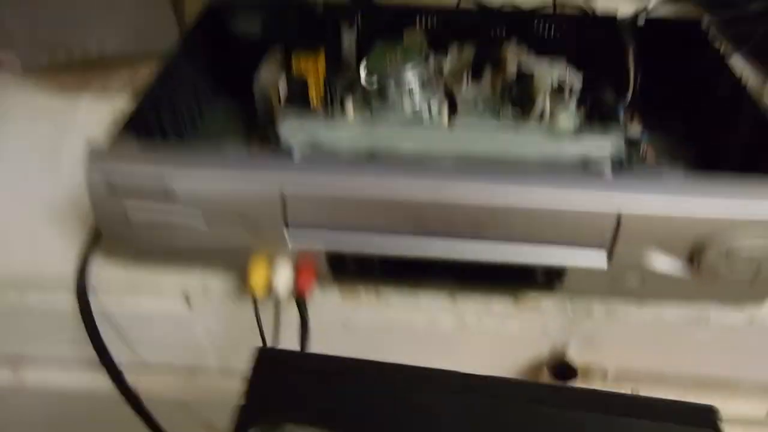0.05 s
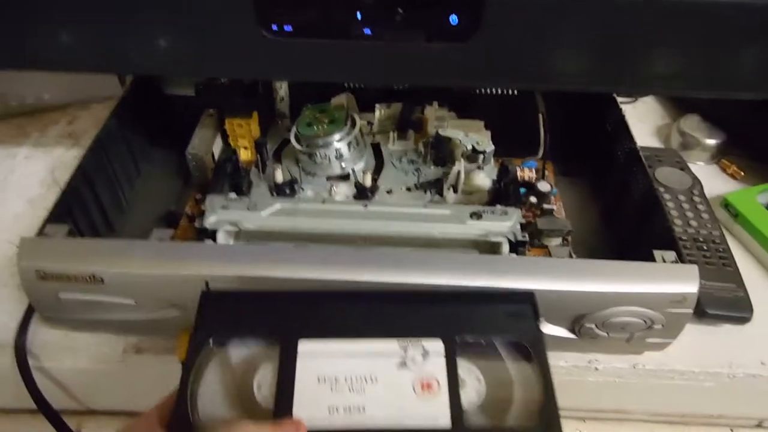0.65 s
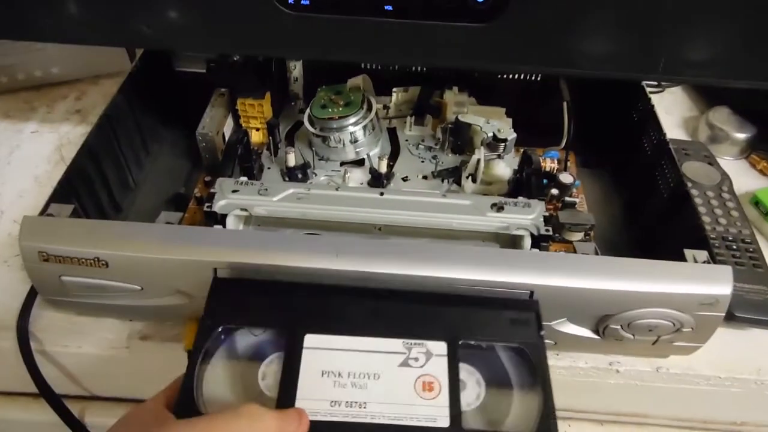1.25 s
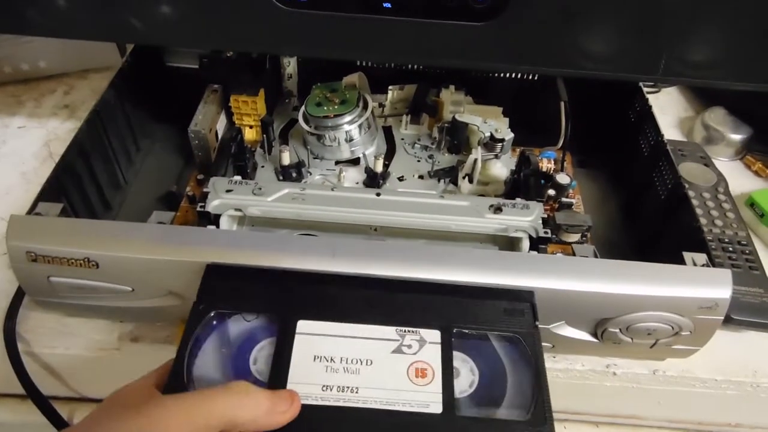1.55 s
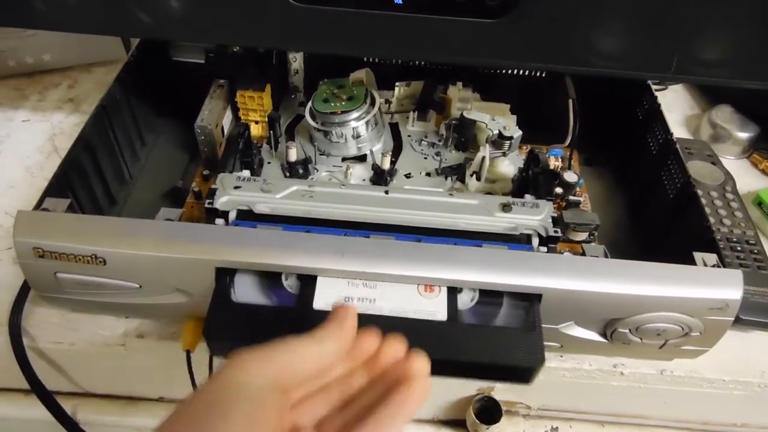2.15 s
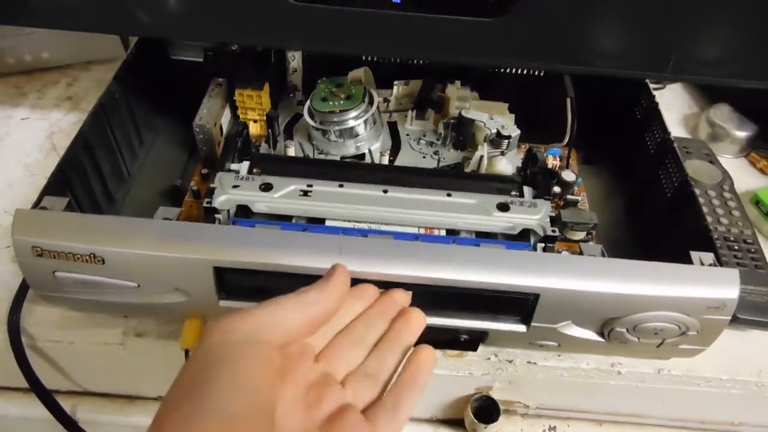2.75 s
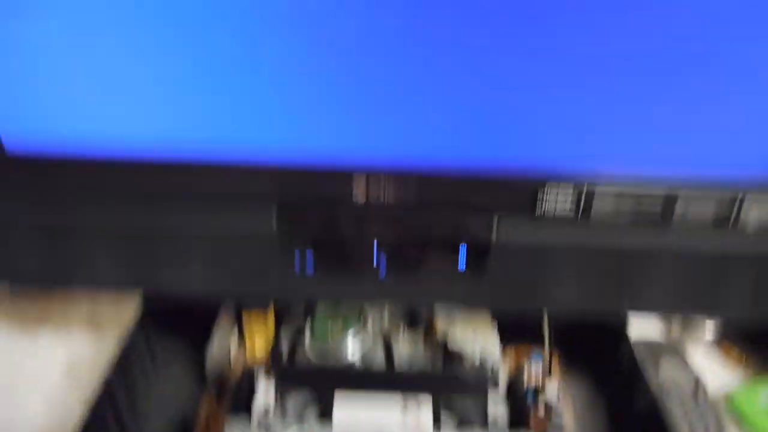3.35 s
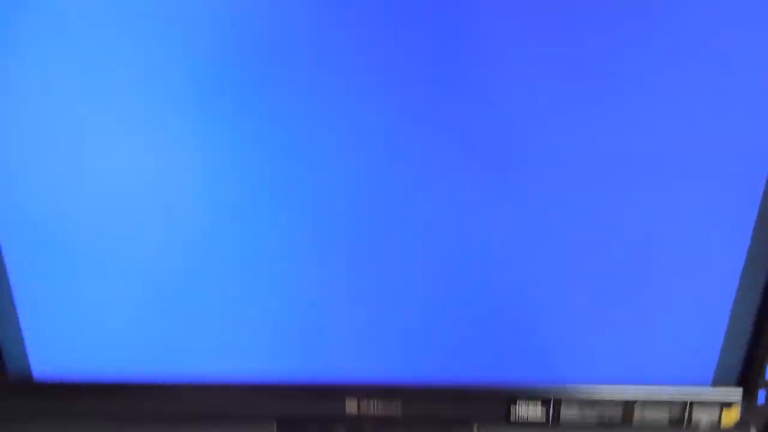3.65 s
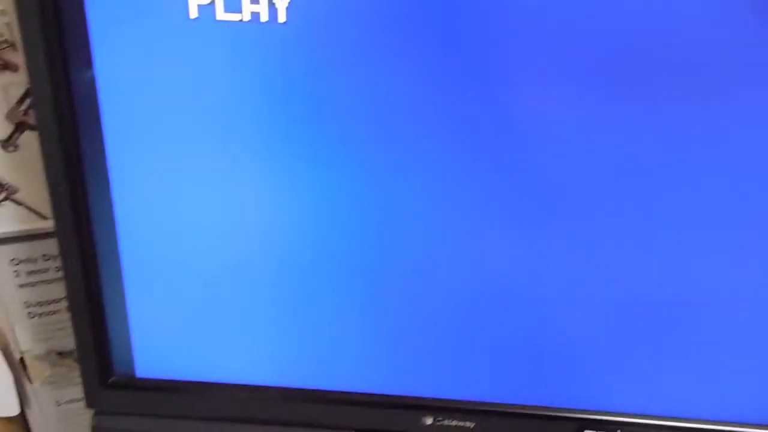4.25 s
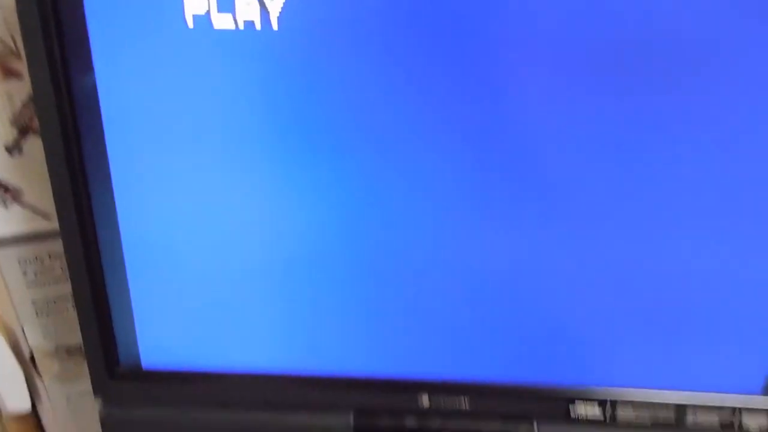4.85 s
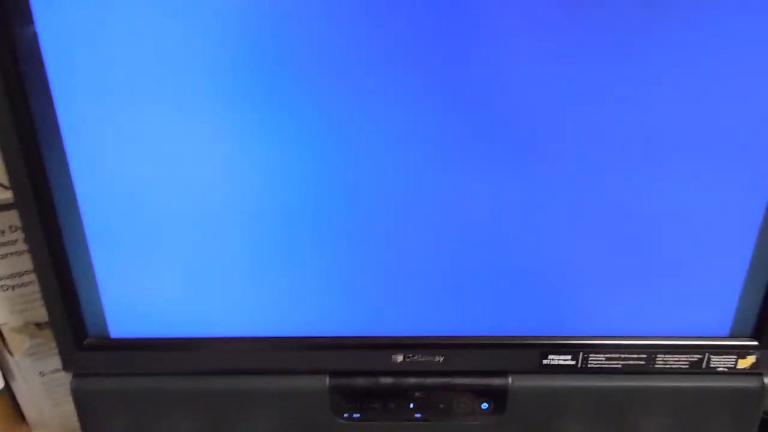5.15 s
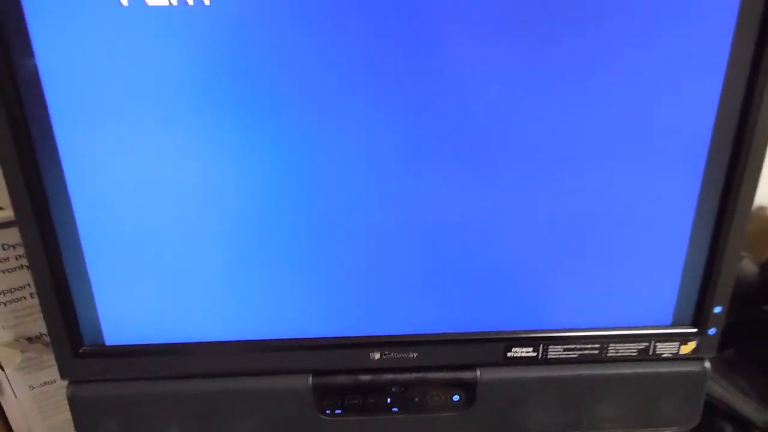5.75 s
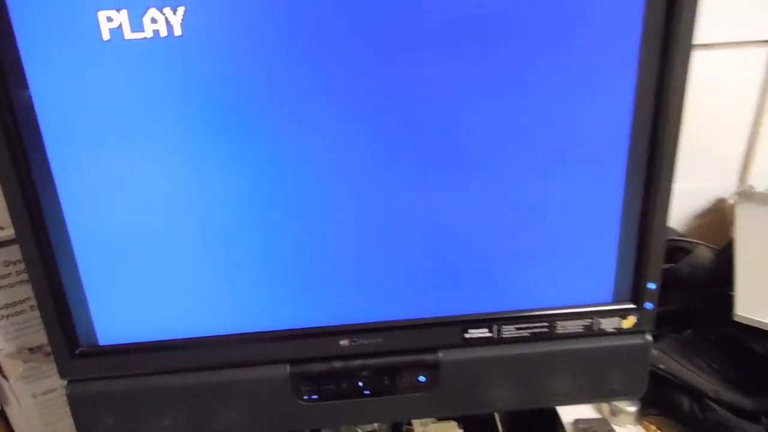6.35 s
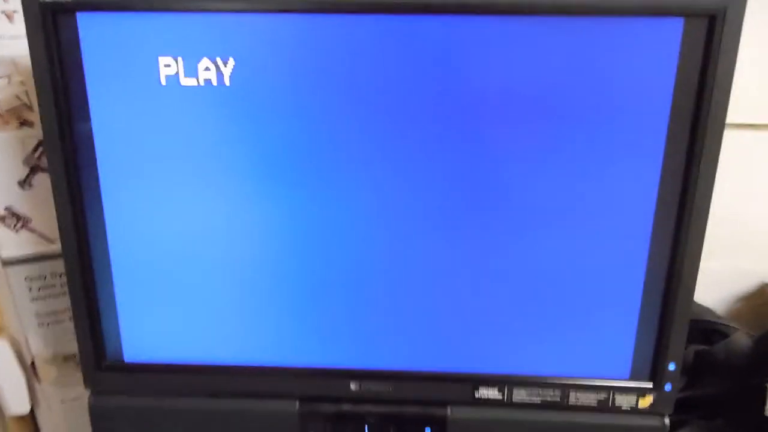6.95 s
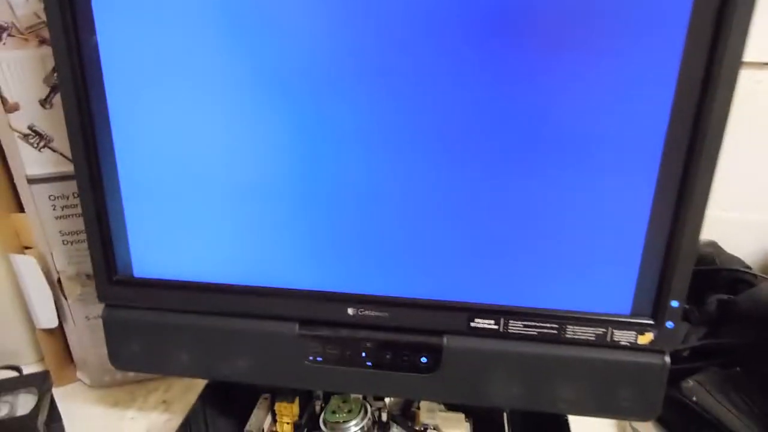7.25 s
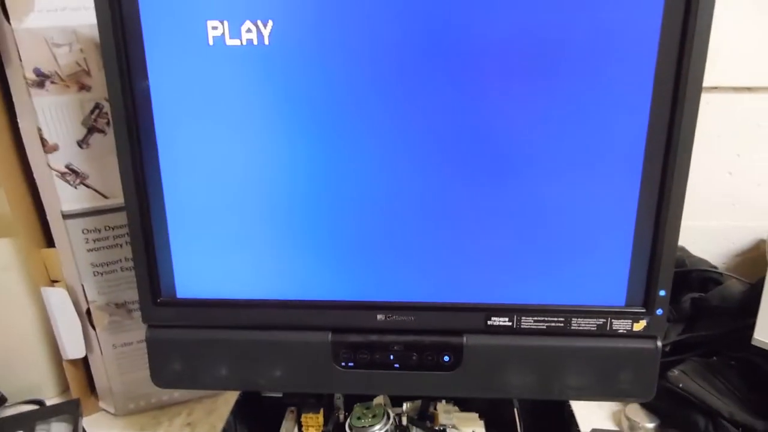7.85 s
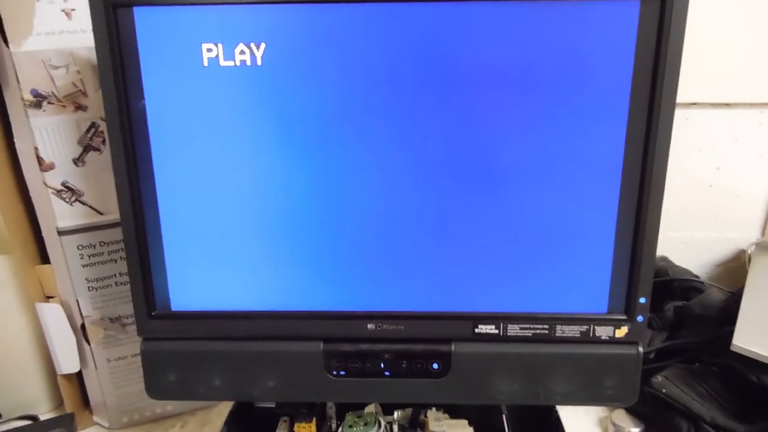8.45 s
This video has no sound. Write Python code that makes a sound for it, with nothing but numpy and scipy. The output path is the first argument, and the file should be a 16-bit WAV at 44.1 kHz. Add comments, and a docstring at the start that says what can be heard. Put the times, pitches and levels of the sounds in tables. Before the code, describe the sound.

A plastic videocassette clacks and scrapes into a video recorder, then gears whir, a motor whines up and small levers click indoors.

```python
"""A small room, close to an open video recorder. A plastic cassette is picked up, knocked against the
slot and pushed in: it clacks and scrapes, ringing shell, tray and chassis. Gears whir as it is drawn
in and dropped on the deck. The head drum whines up to speed, levers click and the capstan starts the
tape. Brief squeaks, one pop and a few soft handling bumps and rustles sound over a faint hiss."""
import sys
import numpy as np
from scipy import signal
from scipy.fft import rfft, irfft
from scipy.io import wavfile

SR = 44100
rng = np.random.default_rng(int(sys.argv[2]) if len(sys.argv) > 2 else 0)


def persist_wave(psi):
    """Save psi, clipped to +-1, as 16-bit WAV."""
    counts = np.round(np.clip(psi, -1, 1) * 32767).astype(np.int16)
    wavfile.write(sys.argv[1], SR, np.atleast_2d(counts).T)


N = 374850
TIME = np.arange(N) / SR
DRUM_START_S = 4.19
# spectrum of the struck or rubbed shell: f/Hz, density/dB
CLACK_SPECTRUM = [(40, -33), (100, -21), (150, -22), (260, -16.5), (350, -8), (520, -9), (660, 0),
                  (1400, -1), (2800, -1), (5600, -8.5), (7900, -5.5), (9500, -14.5), (12000, -29.5),
                  (16000, -47)]


def cassette_knocks():
    """The shell strikes flap, guides and deck."""
    # blows: t/s, level/dB, bass shelf/dB, treble shelf/dB
    knocks = [(.559,-25,8.5,18), (.8598,-14.5,-11,0), (.865,-15,-1.5,3), (.925,-31.5,-1,-5),
              (1.2647,-14.5,-9.5,7), (1.3658,-25,2,-4.5), (1.4295,-26,-4,0), (1.452,-18.5,2,0.5),
              (1.459,-21,6,2.5), (1.567,-34,11,15), (1.577,-28,0,0), (1.765,-23,-23,-3), (1.78,-6,-9.5,0),
              (1.793,-25,18,21), (1.957,-17.5,-19,-2), (2.005,-10,4,-15), (2.017,-14,2,-10),
              (2.084,-22,1.5,-6.5), (2.2705,-39,6,-1), (2.312,-23.5,7,-9.5), (2.497,-38,10.5,3.5),
              (2.668,-38.5,18,9), (2.737,-18,1,1.5), (2.7555,-17,10,14), (2.962,-29.5,-12.5,-4.5),
              (2.999,-34.5,-4,-31), (3.074,-37,-5,-2), (3.169,-35,9,13.5), (3.3285,-20.5,-34,-7),
              (3.351,-19.5,-8,10.5), (3.396,-28,12.5,7), (3.478,-32.5,-20,-9), (3.499,-25,-23,1),
              (3.512,-23.5,14.5,14), (3.523,-15,11,8), (3.6,-36,6,3), (3.666,-37.5,7,-10)]
    return impacts(knocks, CLACK_SPECTRUM, ring_db=-10)


def impacts(rows, spectrum, ring_db, gain_db=0, size=8192):
    """Each blow is a crack, dying chatter and four short rings; firm blows damp sooner than loose ones."""
    firm_t60_s, loose_t60_s, firm_above_db, knee_db = 0.028, 0.09, -21, 3
    crack, build_s, ring_width_hz = 3.3, 0.00019, 160
    out, age = np.zeros(N), np.arange(size) / SR
    for start_s, db, bass_db, treble_db in rows:
        t60_s = firm_t60_s + (loose_t60_s - firm_t60_s) / (1 + np.exp((db - firm_above_db) / knee_db))
        blow = grains(per_s=9000, spread_db=3.45, size=size)
        blow *= (1 - np.exp(-age / build_s)) * decay(age, t60_s)
        blow[0] += crack * rng.choice([-1, 1])
        rings_hz = 1500 * 5 ** rng.random(4)
        rings = from_db(ring_db) * sum(resonance(blow, hz, ring_width_hz) for hz in rings_hz)
        plain = colour(blow, spectrum, bass_db, treble_db)
        ringing = colour(blow + rings, spectrum, bass_db, treble_db)
        ringing *= np.linalg.norm(plain) / np.linalg.norm(ringing)  # rings add no energy
        add(out, start_s, from_db(db + gain_db) * ringing)
    return highpass(out, 80, order=2)  # small parts radiate no deep bass


def cassette_scrapes(catch_db=-1, catches_per_s=90):
    """Stick-slip grains shake the shell as it slides along hand, flap and guides."""
    # strokes: peak t/s, level/dB, rise/s, fall/s, treble shelf/dB
    strokes = [(0.158,-50,0.14,0.076,-12), (0.329,-36.5,0.21,0.23,9.5), (.45,-45,0.045,0.22,5),
               (0.573,-29,0.018,0.083,14), (1.01,-43.5,0.12,0.084,-2), (1.248,-35.5,0.11,0.054,-6.5),
               (1.461,-27.5,0.027,0.073,-11), (1.788,-19,0.044,0.048,-1.5), (2.009,-19.5,.1,0.053,4.5),
               (2.308,-34.5,0.039,0.024,1.5), (2.65,-38.5,0.095,0.18,1), (2.764,-32,0.04,0.046,-17),
               (3.17,-45.5,.1,0.087,-18), (3.355,-28.5,0.033,0.09,3), (3.519,-20.5,0.026,0.037,6.5),
               (3.65,-47,0.13,.07,-5)]
    slips = grains(per_s=5000, spread_db=5.2) * from_db(catch_db * drift(catches_per_s))
    rub = colour(slips, CLACK_SPECTRUM)
    treble = signal.sosfiltfilt(signal.butter(2, 5000, "high", fs=SR, output="sos"), rub)
    out = 0
    for peak_s, db, rise_s, fall_s, treble_db in strokes:
        shelved = rub + (from_db(treble_db) - 1) * treble
        shelved_rms = np.sqrt(1 + 0.11 * (from_db(2 * treble_db) - 1))
        out += swell(peak_s, db, rise_s, fall_s) * shelved / shelved_rms
    return out


def tray(x, seated_s=2.27, seating_s=0.09, ring_db=-2):
    """Once the cassette is seated, blows and rubbing ring the hollow tray."""
    return x + from_db(ring_db) * resonance(x * ramp(seated_s, seating_s), hz=712, width_hz=97)


def chassis(x, ring_db=-7.5, spread_db=2.5, points_per_s=9):
    """Shell and sheet-metal deck ring on; each mode's share varies with the point of contact."""
    # modes: f/Hz, relative level/dB, t60/s
    modes = [(105.3, 9.5, 0.32), (356, -4, 0.43), (642, 0.5, 0.065), (717, 3, 0.081), (724, -2, 0.061),
             (930, -10.5, 0.23), (960, 7, 0.035), (1016, -1.5, 0.079), (1298, 3, 0.21), (1450, -12, 0.61),
             (2220, -42, 0.15), (2520, -24, 0.14), (3270, -8, 0.037), (8390, 6.5, 0.087)]
    rings = 0
    for hz, db, t60_s in modes:
        share = from_db(db + ring_db + spread_db * drift(points_per_s))
        rings += resonance(x * share, hz, width_hz=np.log(1000) / np.pi / t60_s)
    return x + rings


def head_drum(top_hz=1417, climb_hz_per_s=2050, ease_s=0.12, drive_db=-40.5):
    """Drive harmonics sweep up through the drum's resonances; as torque eases, the deck's hum fades in."""
    # drum resonances: f/Hz, width/Hz, gain/dB
    modes = [(1128, 33, 11), (1440, 49, -11), (2410, 940, -14), (3500, 900, -17)]
    # hum of the running deck: f/Hz, level/dB
    hum_lines = [(1050, -68), (1085, -72.5), (1437, -63), (2040, -96), (3650, -74), (6998, -75)]
    climb_s = top_hz / climb_hz_per_s
    speed = ramp(DRUM_START_S, climb_s)
    torque = ramp(DRUM_START_S + climb_s + ease_s, -2 * ease_s)
    drive_hz = top_hz * speed
    phase = wavering_phase(drive_hz, waver=0.022)
    pulses = sum(np.sin(k * phase) * (k * drive_hz < SR / 4) / k for k in range(1, 9))
    drive = pulses * np.sqrt(speed) * torque * from_db(drive_db)
    drive = highpass(drive, 700, order=6)  # a small drum radiates little bass
    whine = sum(from_db(db + 3.5 * drift(per_s=70)) * resonance(drive, hz, width_hz)
                for hz, width_hz, db in modes)
    hum = sum(from_db(db + 1.5 * drift(per_s=6.9)) * tone(hz, waver=0.00843) for hz, db in hum_lines)
    return whine + (1 - torque) * hum


def drum_shudder():
    """Uneven torque rings the drum: a shudder early in the climb, a whistle near the top."""
    shudder = swell(peak_s=4.44, db=-45, rise_s=0.45, fall_s=0.24) * noise_band(hz=1113, width_hz=100)
    whistle = swell(peak_s=4.8, db=-62, rise_s=1.0, fall_s=0.45) * noise_band(hz=7110, width_hz=110)
    return (shudder + whistle) * ramp(DRUM_START_S, 0.0098)


def levers():
    """Small levers and brakes click along the tape path."""
    # clicks: t/s, relative level/dB, bass shelf/dB, treble shelf/dB
    clicks = [(3.998,-33,-7,-12.5), (4.083,-42,5,-7), (5.131,-35.5,10,6.5), (5.644,-30.5,-41,3.5),
              (5.732,-35.5,-48,0), (5.785,-29.5,-1,2), (5.962,-37,5,2), (6.027,-36,4,-2), (6.273,-45.5,6,3),
              (6.361,-42.5,5,-10), (6.378,-35,-37,-17), (6.529,-37,-7,-28), (6.551,-37.5,-3,-7)]
    # lever spectrum: f/Hz, density/dB
    spectrum = [(100, -42), (400, -6.5), (700, -5), (1150, 9.5), (1600, 1.5), (2600, 1.5), (3900, 1),
                (5000, 4), (6200, -0.5), (7900, 6), (9500, -5), (15000, -37)]
    return impacts(clicks, spectrum, ring_db=-3, gain_db=1.5)


def capstan(start_s=8.262, rise_s=0.062, attack_s=0.023, from_hz=1220, top_hz=1800, pull_db=3):
    """A rough whir jumps up to speed, a little louder while it pulls."""
    hz = from_hz + (top_hz - from_hz) * ramp(start_s, rise_s)
    pull = 1 - ramp(start_s + rise_s, attack_s)
    gain = ramp(start_s, attack_s) * from_db(-47.5 + pull_db * pull)
    whir = 0.3 * tone(hz, waver=0.0122) + 0.5 * tone(hz, waver=0.06)
    octave = from_db(-17) * tone(2 * hz, waver=0.03)
    return gain * (whir + octave)


def gears(ramp_s=0.034, flutter_db=2):
    """Plastic teeth and tape guides rub in a fine, uneven whir."""
    # loading, turning the reels, shifting the tape path: start t/s, stop t/s, level/dB
    runs = [(2.557, 4.144, -56), (5.06, 8.7, -58.5), (5.688, 7.97, -58.5)]
    # gear spectrum: f/Hz, density/dB
    spectrum = [(80, -24), (250, -5), (700, -1), (1400, 2), (2600, 0), (5500, -5), (8100, -2),
                (10000, -13.5), (15000, -28)]
    power = sum(from_db(db) ** 2 * ramp(start_s, ramp_s) * ramp(stop_s, -ramp_s)
                for start_s, stop_s, db in runs)
    teeth = grains(per_s=4000, spread_db=3.6) * np.sqrt(power)
    return colour(teeth * from_db(flutter_db * drift(per_s=60)), spectrum)


def pop(tick_hz=4300, tick_t60_s=0.0048, size=4000):
    """A sharp pop: one short ring with a bright tick and no bass."""
    # pop: t/s, level/dB, f/Hz, t60/s
    pops = [(7.001, -19, 1526, 0.021)]
    out, age = np.zeros(N), np.arange(size) / SR
    for start_s, db, hz, t60_s in pops:
        ring = np.sin(2 * np.pi * hz * age) * decay(age, t60_s)
        tick = 0.51 * np.sin(2 * np.pi * tick_hz * age) * decay(age, tick_t60_s)
        add(out, start_s, from_db(db) * (ring + tick))
    return highpass(out, 1000, order=4)


def handling(size=12000):
    """Handling makes dull bumps and soft rustles."""
    # bumps: t/s, level/dB, t60/s
    bumps = [(.425, -36, 0.23), (6.851, -33, 0.14), (7.372, -49.5, 0.21), (7.416, -36, 0.18),
             (7.834, -46.5, 0.14)]
    # rustles: peak t/s, level/dB, rise/s, fall/s
    swishes = [(6.575,-40.5,0.11,0.099), (6.96,-51.5,0.35,0.12), (7.3,-47.5,.27,0.1),
               (7.43,-48.5,0.15,0.18), (7.9,-52,0.094,0.12)]
    # bump and rustle spectra: f/Hz, density/dB
    bump_spectrum = [(60, -26), (120, -26), (170, 4.5), (280, -3.5), (420, 7), (600, 2.5), (1200, 3),
                     (2000, -8.5), (5000, -27), (12000, -57)]
    rustle_spectrum = [(200, -26), (900, 7), (2500, 3), (5000, 0), (8000, 10.5), (11000, -3.5),
                       (16000, -21)]
    thuds, age = np.zeros(N), np.arange(size) / SR
    for start_s, db, t60_s in bumps:
        add(thuds, start_s, from_db(db) * grains(per_s=3000, spread_db=1, size=size) * decay(age, t60_s))
    rustle = sum(swell(*row) for row in swishes) * grains(per_s=9800, spread_db=4.2)
    return colour(thuds, bump_spectrum) + colour(rustle, rustle_spectrum)


def squeaks():
    """Rubbed plastic and bearings give short, rough whistles."""
    # squeaks: t/s, length/s, f/Hz, level/dB
    whistles = [(0.35, 0.17, 1874, -42.5), (0.37, 0.17, 2360, -44), (3.91, 0.18, 5640, -54),
                (6.011, 0.046, 7730, -38), (6.144, 0.14, 6800, -61), (7.705, 0.066, 5630, -55),
                (7.711, 0.041, 3650, -57.5), (8.025, .07, 5710, -59)]
    return sum(from_db(db) * np.sin(np.pi * ramp(start_s, length_s)) ** 2 * tone(hz, waver=0.035)
               for start_s, length_s, hz, db in whistles)


def room_echo(x, build_s=0.0024, size=26000):
    """Dense reflections build quickly and die at their own rate in each octave."""
    # reverberation: f/Hz, t60/s
    decay_times = [(100, 0.26), (260, 0.35), (700, 0.28), (1840, 0.34), (4850, 0.18), (12800, 0.29)]
    age, hz = np.arange(size) / SR, np.arange(size // 2 + 1) * SR / size
    white, centres_hz = rfft(rng.standard_normal(size)), np.geomspace(100, 12800, 8)
    tail = 0
    for centre_hz, share in zip(centres_hz, np.eye(len(centres_hz))):
        band = irfft(white * at_hz(np.c_[centres_hz, share], hz))
        tail += band * decay(age, at_hz(decay_times, centre_hz))
    tail *= 1 - np.exp(-age / build_s)
    return through(x, tail)


def room_hiss(level_db=-57):
    """Steady background noise."""
    # room tone: f/Hz, density/dB
    spectrum = [(30, -22), (70, -22.5), (150, -18.5), (380, -6), (700, -6), (1050, -4), (1300, -4),
                (2200, -5.5), (4500, -11), (8000, -14), (11000, -21), (16000, -30.5)]
    return from_db(level_db) * colour(rng.standard_normal(N), spectrum)


def from_db(db):
    """Decibels to gain."""
    return 10 ** (np.asarray(db) / 20)


def rms_one(x):
    """Scale to rms 1."""
    return x / np.sqrt(np.mean(x ** 2) + 1e-20)


def at_hz(points, hz):
    """Read a table on a log-frequency axis."""
    knots_hz, values = np.transpose(points)
    return np.interp(np.log(hz + 1), np.log(knots_hz), values)


def add(out, start_s, x):
    """Mix x into out from start_s."""
    i = max(0, round(start_s * SR))
    out[i:i + len(x)] += x[:max(0, N - i)]


def ramp(zero_s, length_s):
    """Line from 0 at zero_s to 1 at zero_s + length_s; a negative length fades out."""
    return np.clip((TIME - zero_s) / length_s, 0, 1)


def decay(age_s, t60_s):
    """Gain falling 60 dB per t60_s."""
    return from_db(-60 * age_s / t60_s)


def swell(peak_s, db, rise_s, fall_s):
    """Gain climbing 20 dB per rise_s to its peak, then sinking 20 dB per fall_s."""
    away = np.maximum((peak_s - TIME) / rise_s, (TIME - peak_s) / fall_s)
    return from_db(db - 20 * np.minimum(away, 10))


def drift(per_s):
    """Random wander between knots of spread 1."""
    knots = rng.standard_normal(N // 20)
    return np.interp(TIME * per_s, np.arange(len(knots)), knots)


def grains(per_s, spread_db, size=N):
    """Tiny slips of uneven strength at random moments; rms 1."""
    slips = (rng.random(size) < per_s / SR) * rng.choice([-1, 1], size)
    return rms_one(slips * from_db(spread_db * np.clip(rng.standard_normal(size), -2, 2)))


def wavering_phase(hz, waver, per_s=200):
    """Phase of a pitch that trembles by the fraction waver."""
    return 2 * np.pi * np.cumsum(hz * (1 + waver * drift(per_s))) / SR


def tone(hz, waver):
    """Trembling sine; rms 1."""
    return np.sqrt(2) * np.sin(wavering_phase(hz, waver, per_s=300))


def noise_band(hz, width_hz):
    """Noise passed twice through a resonance; rms 1."""
    once = resonance(rng.standard_normal(N), hz, width_hz)
    return rms_one(resonance(once, hz, width_hz))


def resonance(x, hz, width_hz):
    """Two-pole resonance, peak gain 1."""
    radius = np.exp(-np.pi * width_hz / SR)
    feedback = [1, -2 * radius * np.cos(2 * np.pi * hz / SR), radius ** 2]
    return signal.lfilter(np.array([1, 0, -1]) * (1 - radius ** 2) / 2, feedback, x + 1e-18)


def highpass(x, hz, order):
    """Cut below hz."""
    return signal.sosfilt(signal.butter(order, hz, "high", fs=SR, output="sos"), x + 1e-18)


def through(x, response):
    """Convolve with the response scaled to energy 1, keeping the length."""
    return signal.oaconvolve(x, response / np.linalg.norm(response))[:len(x)]


def colour(x, spectrum, bass_db=0, treble_db=0, size=2048):
    """Minimum-phase filter from a spectrum and two shelves."""
    hz = np.arange(size // 2 + 1) * SR / size
    bass, treble = 1 / (1 + (hz / 1000) ** 4), 1 - 1 / (1 + (hz / 5000) ** 4)
    db = at_hz(spectrum, hz) + bass_db * bass + treble_db * treble
    cepstrum = irfft(np.log(from_db(db)))
    cepstrum[1:size // 2] *= 2
    cepstrum[size // 2 + 1:] = 0
    return through(x, irfft(np.exp(rfft(cepstrum))))


def machine_in_room(tones=0, click=0, wet_db=-4.5, click_wet_db=-10):
    """A fresh draw of the noisy sources, plus any tones and click, with reflections and hiss."""
    cassette = tray(cassette_knocks() + cassette_scrapes())
    direct = chassis(cassette + gears()) + levers() + handling() + tones
    echo = room_echo(from_db(wet_db) * direct + from_db(click_wet_db) * click)
    return direct + click + echo + room_hiss()


def stereo(mid, side, left_db=-2, right_db=2.5):
    """Two close microphones agree in the bass and differ in the treble."""
    # side against mid: f/Hz, level/dB
    width = [(100, -13), (600, -11.5), (1200, -11), (2200, -7), (4500, -2), (12000, -2)]
    hz = np.arange(N // 2 + 1) * SR / N
    side = irfft(rfft(side) * from_db(at_hz(width, hz)), N)
    return np.array([mid + side, mid - side]) * from_db([[left_db], [right_db]])


def scene():
    """Cassette, mechanism and motors; tones and pop go to the mid signal only."""
    tones = squeaks() + head_drum() + drum_shudder() + capstan()
    return stereo(mid=machine_in_room(tones, pop()), side=machine_in_room())


def record(dry, knee=0.8, bass_hz=300, cutoff_hz=15850):
    """Round the highest peaks, sparing the bass, and cut the top."""
    excess = highpass(dry - knee * np.tanh(dry / knee), bass_hz, order=2)
    return signal.sosfilt(signal.ellip(10, 0.2, 70, cutoff_hz, fs=SR, output="sos"), dry - excess)


dry = scene()
out = record(dry)
persist_wave(out)
```